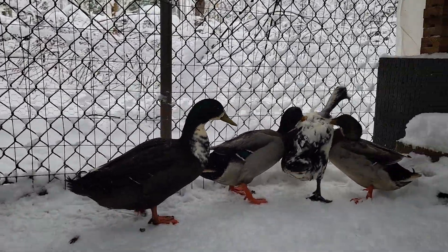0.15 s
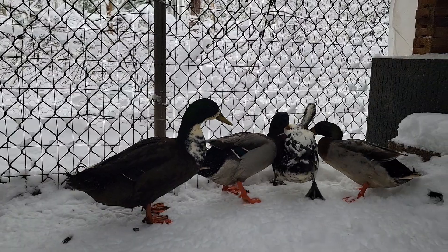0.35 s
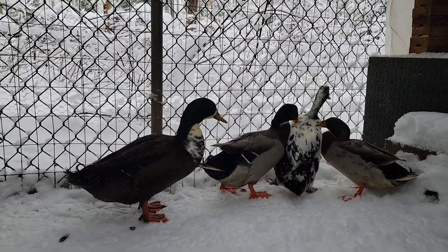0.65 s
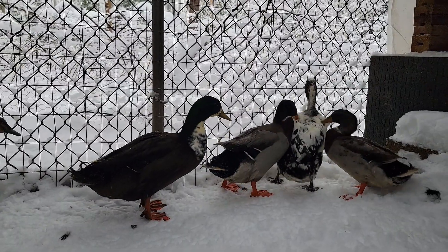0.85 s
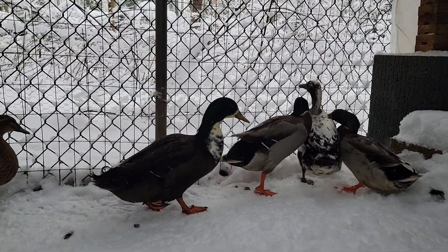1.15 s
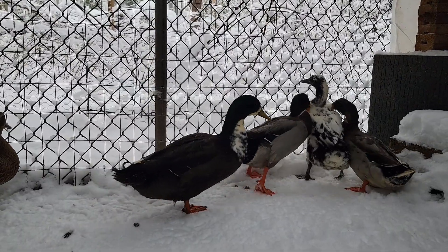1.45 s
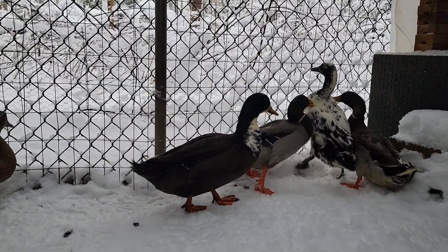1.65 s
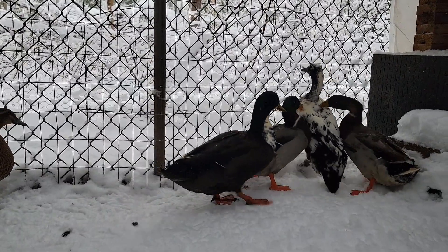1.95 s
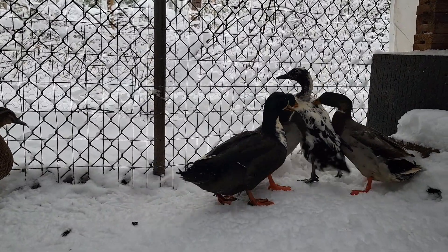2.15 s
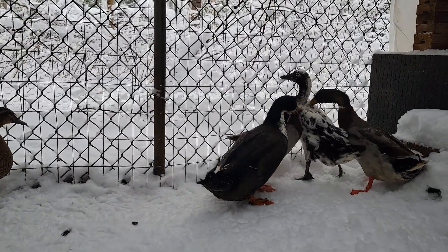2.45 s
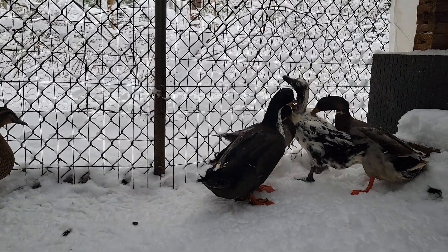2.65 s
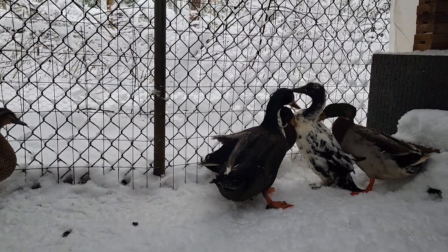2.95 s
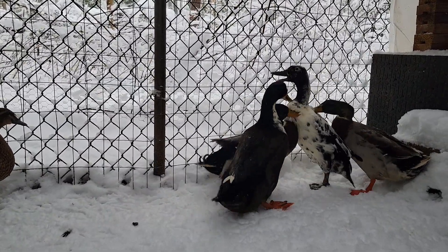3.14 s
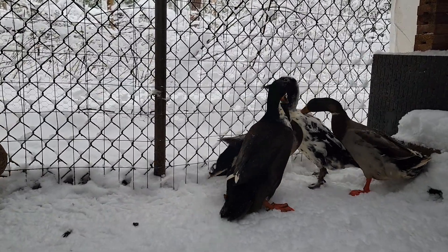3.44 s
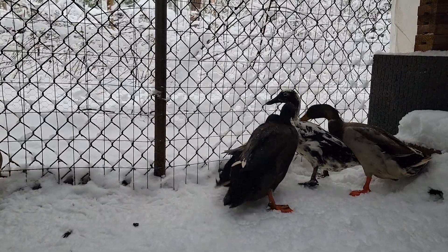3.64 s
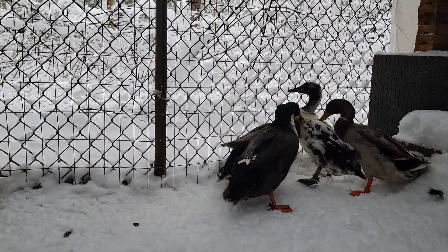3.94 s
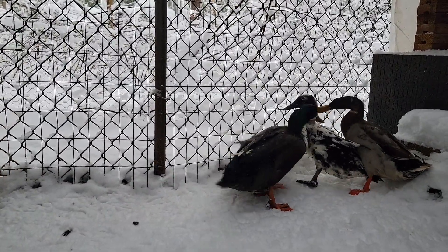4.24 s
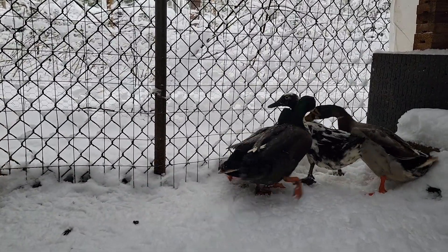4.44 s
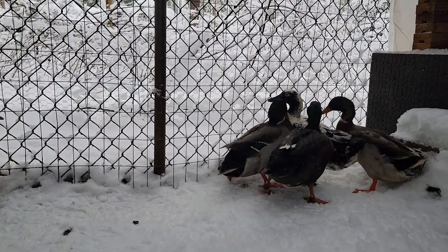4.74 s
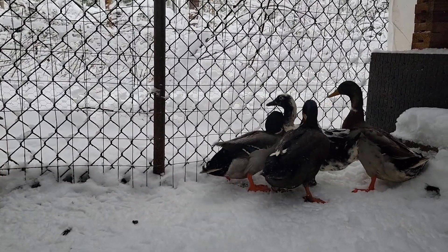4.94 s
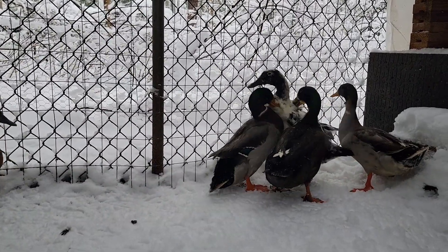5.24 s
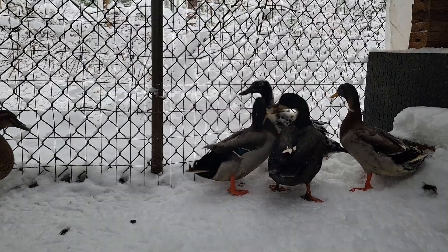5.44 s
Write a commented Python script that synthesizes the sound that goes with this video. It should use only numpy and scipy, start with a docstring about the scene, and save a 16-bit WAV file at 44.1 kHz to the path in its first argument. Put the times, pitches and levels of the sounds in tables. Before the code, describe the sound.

A quiet winter pen, heard in stereo from close by. A low, wavering engine drone, around 60 hertz, runs far off throughout, with dull outdoor murmur and faint hiss. At about 0.8 s a duck gives a loud, rasping quack, a quarter second long, starting low and rough and rising as the bill opens. A second, higher and brighter quack follows at 3.0 s, equally abrupt, with tight echoes from snow, wall and fence. Irregular dry ticks of bills and feathers continue underneath. Webbed feet softly thud and crunch on packed snow near 1.2, 1.4, 2.2, 3.5, 4.0-4.2 and 4.8 s, then in a quick cluster at 5.4-5.5 s. A dull low bump falls at 2.5 s. Thin, falling bird chirps sound far away at 0.5, 2.6 and 3.8 s. A barely audible whine enters after 3.2 s, and a soft two-pulse cluck comes at 5.3 s.

```python
"""A distant engine drones under quiet winter air: two wavering firing orders, filtered-noise rumble, murmur, hiss.
Bills and feathers tick (noise bursts); a small bird calls thinly far off (falling sines with scatter).
A duck gives two loud, rasping quacks: uneven pulses and puffs ring chest, throat, bill and windpipe.
Webbed feet pat and crunch on packed snow in a pen beside a house wall (enveloped noise).
Also one low noise bump, a faint far whine (sine) and, near the end, a soft two-pulse cluck (decaying sines)."""
import sys
import numpy as np
from scipy import signal
from scipy.fft import rfft, irfft, next_fast_len
from scipy.io import wavfile
from scipy.ndimage import uniform_filter1d

SR = 44100
rng = np.random.default_rng(int(sys.argv[2]) if len(sys.argv) > 2 else 0)


def generate_wav(signal):
    """Clip the signal to [-1, 1] and save it as 16-bit WAV at the path in sys.argv[1]."""
    frames = np.transpose(np.atleast_2d(signal))
    scaled = np.clip(frames, -1, 1) * 32767
    pcm = np.round(scaled).astype(np.int16)
    wavfile.write(sys.argv[1], SR, pcm)


N = 246519
TIME = np.arange(N) / SR

# distant engine speed: t/s, firing f/Hz
ENGINE_SPEED = [(0, 56.24), (.55, 56.61), (.75, 60.4), (1.35, 61.17), (1.6, 57.8), (2.15, 60.46),
                (2.55, 58.6), (2.9, 63.23), (4.1, 65.35), (4.95, 61.7), (5.59, 61.7)]
# noise colours: f/Hz, relative density/dB
RUMBLE_SPECTRUM = [(20, -12.5), (40, -10), (55, 4), (85, -3.5), (115, -4.5), (170, -14), (240, -35.5),
                   (400, -76)]
MURMUR_SPECTRUM = [(100, 1), (170, -2.5), (262, -11), (736, -14), (1010, -18), (1150, -16.5), (1490, -24),
                   (1990, -21.5), (3000, -43.5), (3900, -54), (6600, -120)]
HISS_SPECTRUM = [(1470, 4.5), (2500, 2), (2970, 0.5), (3660, -1.5), (4310, 0.5), (6760, -3.5), (7300, 3),
                 (8140, -11.5), (9730, -11.5), (13200, -10), (14400, -4.5), (15200, -1), (16000, -50)]
# hiss: t/s, mean level/dB
HISS_LEVEL = [(0, -65), (.4, -66), (.7, -68), (1.6, -67.5), (2.7, -67.5), (5.59, -66)]

# clearest ticks of bills and feathers: t/s, relative level/dB
CLEAR_TICKS = [(1.183, -61), (1.77, -61), (4.11, -58.5), (4.596, -55.5), (5.539, -55)]
# tick colour: f/Hz, relative density/dB
TICK_SPECTRUM = [(900, -39), (2000, -3.5), (5000, 4), (7500, 7.5), (9000, -3.5), (15500, -10)]
# thin falling bird calls: t/s, length/s, first f/Hz, last f/Hz, relative level/dB
CHIRPS = [(0.463, 0.05, 7690, 6970, -55.5), (2.565, 0.084, 7970, 7430, -64.5),
          (3.845, 0.054, 7610, 7070, -65)]

# quacks: start t/s, voice breaks t/s, push ends t/s, level/dB, wide-open throat f/Hz, wide-open bill f/Hz
QUACKS = [(.776, .85, 0.9757, 0, 740, 1236), (2.959, 3.003, 3.198, 0, 758, 1424)]
# syrinx of each quack: t/s, pulse rate/Hz, roughness/0-1
SYRINX_A = [(.776, 108, .4), (.80, 120, .5), (.83, 145, .7), (.86, 156, .6), (.885, 186, .3),
            (.935, 191, .12), (.96, 179, .15), (.99, 160, .3)]
SYRINX_B = [(2.959, 118, .4), (2.985, 155, .7), (3.005, 195, .7), (3.04, 220, .55), (3.07, 236, .35),
            (3.11, 238, .35), (3.14, 244.5, .2), (3.18, 245, .25), (3.21, 226, .5)]
# throat resonances: multiple of throat f, width/Hz, level/dB
THROAT_A = [(.56, 130, -36), (.87, 131, -7), (1.001, 152, 8), (1.26, 171, 4)]
THROAT_B = [(.68, 128, 1), (1, 120.2, 7.5), (1.22, 150, 6.5), (1.45, 150.1, -0.5)]
# open-bill resonances: multiple of bill f, width/Hz, level/dB
BILL_A = [(.9, 127, 15.5), (1.02, 162, 17.5), (1.18, 170, -43), (1.8, 350, -31)]
BILL_B = [(1, 200, 32), (1.16, 200, -16), (1.32, 200, -45), (1.66, 330, -21)]
# upper windpipe resonances: f/Hz, width/Hz, level/dB
WINDPIPE_A = [(3076, 150, 3.5), (4020, 450, -8), (4700, 390, -6), (5300, 430, -4.5), (6300, 450, -10.5),
              (7270, 600, -13.5), (10800, 2500, -26), (14800, 1500, -20)]
WINDPIPE_B = [(3140, 145, 2), (3930, 500, -7.5), (4400, 340, -4.5), (5070, 540, -8), (6300, 520, -13.5),
              (7100, 670, -12.5), (10900, 3100, -24), (14900, 1500, -17)]
# rows chest, throat, bill, rasp; before each quack's trim:
# level at full effort/dB, slope/(dB per octave of pitch), loss with bill shut/dB, attack/s, release/(dB/s)
VOICE_PARTS = [(-32.5, 6, -1.5, 0.0054, 650), (-28, 6.5, 3.5, 0.0035, 908), (-18, 12.5, 5, 0.0088, 1500),
               (-38.5, 17, 3.5, 0.0035, 900)]
# echoes off snow, wall and fence: delay/s, level re direct/dB, left lag of the echo itself/s (negative: left
# first)
ECHOES = [(.0016, -13, .0001), (.0054, -18, -.0003), (0.0103, -14, -.0001)]

# feet on snow: t/s, then relative levels/dB of thud, packing snow, crunch
STEPS = [(1.182, -45, -59.5, -59.5), (1.374, -49, -58, -70), (2.152, -42.5, -57.5, -70),
         (2.351, -46.5, -54.5, -52.5), (3.514, -34.5, -55.5, -54), (3.941, -42.5, -57.5, -57.5),
         (4.109, -40, -45, -52), (4.176, -48.5, -58.5, -88), (4.232, -46.5, -65, -67),
         (4.777, -40, -48.5, -62), (5.4, -40.5, -51, -49.5), (5.458, -35.5, -49.5, -46.5),
         (5.538, -36.5, -48, -45)]
# step colours: f/Hz, relative density/dB
THUD_SPECTRUM = [(100, -11), (150, 3.5), (220, -4), (280, -19.5), (400, -25)]
PACKING_SPECTRUM = [(220, -28), (320, -2), (430, 4), (560, 1.5), (730, 0), (950, -14), (1500, -16)]
CRUNCH_SPECTRUM = [(700, 3), (1100, 7), (1450, 4), (2100, 3), (3200, 3.5), (3600, -5), (5500, -6.5),
                   (7400, -8.5), (8800, -24), (16000, -14.5)]

# bump colour: f/Hz, relative density/dB
BUMP_SPECTRUM = [(30, -2), (60, 8), (140, -3), (220, -30)]
# faint far whine: t/s, f/Hz, mean level/dB
WHINE = [(3.2, 768, -82), (3.4, 760, -71.5), (4.6, 753.2, -68.5), (5.0, 744, -75.5), (5.5, 745, -78)]
# soft cluck pulses: t/s, level/dB
CLUCK_PULSES = [(5.312, -38.5), (5.321, -42.5)]
# throat rung by the cluck: f/Hz, level/dB, t60/s
CLUCK_MODES = [(443, -16, 0.033), (620, 0, 0.017), (885, 4, 0.0097), (1060, 3.5, 0.038)]

CRUISE_HZ, ENGINE_DB, ENGINE_DB_PER_HZ, SECOND_ORDER_DB = 63.04, -47, 0.9, -6.5
MURMUR_DB, MURMUR_SWAY_DB, HISS_FLICKER_DB = -58.5, 1.4, 1.7
FAINT_TICKS_PER_S, FAINT_TICK_DB, FAINT_TICK_SPREAD_DB = 7, -65, 3  # levels before TICK_GAIN_DB
TICK_GAIN_DB = 5.5
FULL_EFFORT_HZ, LIMP_POWER, TURBULENCE = 246.8, 2.3, 1.45
SHUT_THROAT_HZ, SHUT_BILL_HZ = 591, 970
OPENING_S, CLOSING_S, CLOSING_LEAD_S = 0.087, 0.087, 0.029
PORT_LAG_S = .00036
# change at each of two resettlings after a step
SETTLE_S, SETTLE_THUD_DB, SETTLE_PACKING_DB, SETTLE_CRUNCH_DB = 0.0363, -3.5, -5.5, -20
BUMP_S, BUMP_DB = 2.47, -33.5
CUTOFF_HZ = 15900


def from_db(db):
    """Decibels to gain."""
    return 10 ** (np.asarray(db) / 20)


def rms_one(x):
    """Scale to an rms of 1."""
    return x / np.sqrt(np.mean(x ** 2) + 1e-20)


def in_time(rows, t=TIME):
    """Columns of a curve, joined by straight lines."""
    s, *columns = np.transpose(rows)
    return [np.interp(t, s, c) for c in columns]


def butter(x, hz, kind, order=2):
    """Causal Butterworth filter."""
    return signal.sosfilt(signal.butter(order, hz, kind, fs=SR, output="sos"), x + 1e-18)


def drift(knots_per_s):
    """Random knots joined by lines; rms 1."""
    knots = rng.standard_normal(2048)
    return rms_one(np.interp(TIME * knots_per_s, np.arange(len(knots)), knots))


def delayed(x, seconds):
    """The sound a moment later."""
    return np.interp(TIME - seconds, TIME, x, left=0)


def at_ports(x, lag_s):
    """A sound from one side reaches the left port later than the right."""
    return np.array([delayed(x, lag_s / 2), delayed(x, -lag_s / 2)])


def noise(spectrum, alike):
    """Stereo noise of a given colour and left-right likeness; rms 1."""
    hz, db = np.transpose(spectrum)
    size = next_fast_len(N)
    f = np.maximum(np.arange(size // 2 + 1) * SR / size, 1)
    gain = from_db(np.interp(np.log(f), np.log(hz), db, left=-90, right=-90))
    mid, side = irfft(rfft(rng.standard_normal((2, size))) * gain, size)[:, :N]
    alike = np.clip(alike, 0, 1)
    return rms_one(np.sqrt(1 + alike) * mid + np.sqrt(1 - alike) * side * [[1], [-1]])


def burst(s, rise_s, length_s):
    """A quick swell that dies by 20 dB over its length."""
    age = np.maximum(TIME - s, 0)
    return np.minimum(age / rise_s, 1) * from_db(-20 * np.minimum(age / length_s, 10))


def yard(x, t60_s, band_hz, rise_s):
    """Diffuse scatter from fence, wall and trees, different on each side."""
    t = TIME[:SR]
    tail = butter(rng.standard_normal((2, SR)), band_hz, "band")
    tail = tail * from_db(-60 * np.minimum(t / t60_s, 4)) * np.minimum(t / rise_s, 1)
    return signal.fftconvolve(x[None], rms_one(tail) / np.sqrt(SR), axes=1)[:, :N]


def engine():
    """From far away only the two lowest firing orders arrive, louder with speed, over a rumble."""
    hz, = in_time(ENGINE_SPEED)
    db = ENGINE_DB + ENGINE_DB_PER_HZ * (hz - CRUISE_HZ)
    phase = 2 * np.pi * np.cumsum(hz) / SR + 0.046 * drift(9.1)
    first = from_db(db + 1.9 * drift(9)) * np.sin(phase)
    second_gain = from_db(db + SECOND_ORDER_DB + 4.44 * drift(12))
    second = second_gain * np.sin(2 * phase + 0.4 * drift(16))
    return np.sqrt(2) * (first + second) + from_db(-50.5) * noise(RUMBLE_SPECTRUM, 1.0)


def air():
    """A dull outdoor murmur and a faint, restless hiss: coloured noise of drifting level."""
    hiss_db, = in_time(HISS_LEVEL)
    murmur = from_db(MURMUR_DB + MURMUR_SWAY_DB * drift(9.1)) * noise(MURMUR_SPECTRUM, 0.5)
    hiss = from_db(hiss_db + HISS_FLICKER_DB * drift(54)) * noise(HISS_SPECTRUM, 0.01)
    return murmur + hiss


def bills():
    """Dry ticks of nibbling and preening: short noise bursts, the faint ones at random times."""
    draws = rng.random((60, 2))
    times = np.cumsum(-np.log(draws[:, 0])) / FAINT_TICKS_PER_S
    levels_db = FAINT_TICK_DB + FAINT_TICK_SPREAD_DB * (2 * draws[:, 1] - 1)
    faint = [(s, db) for s, db in zip(times, levels_db) if s < TIME[-1]]
    ticks = sum(from_db(db + TICK_GAIN_DB) * burst(s, 0.0013, 0.02) for s, db in list(CLEAR_TICKS) + faint)
    return ticks * noise(TICK_SPECTRUM, 0.1)


def small_bird():
    """A wavering whistle slides down and scatters among the trees."""
    song, waver_hz = 0, 90 * drift(400)
    for s, length_s, first_hz, last_hz, db in CHIRPS:
        part = np.clip((TIME - s) / length_s, 0, 1)
        hz = last_hz + (first_hz - last_hz) * (1 - part) ** 1.73 + waver_hz
        swell = np.sqrt(4 * part * (1 - part))
        song = song + from_db(db) * swell * np.sin(2 * np.pi * np.cumsum(hz) / SR)
    scatter = yard(song, t60_s=0.38, band_hz=[4000, 10000], rise_s=0.0086)
    return from_db(-8.0) * song + from_db(-1.5) * scatter


def resonate(x, hz, width_hz):
    """A resonance whose centre may move: a decaying phasor, turned sample by sample."""
    r = np.exp(-np.pi * width_hz / SR)
    turn = np.exp(2j * np.pi * np.cumsum(hz + np.zeros(len(x))) / SR)
    return 2 * np.real(turn * signal.lfilter([1 - r], [1, -r], x / turn))


def tract(x, modes, scale=1):
    """Resonances in parallel, with alternating signs."""
    return sum((-1) ** k * from_db(db) * resonate(x, hz * scale, width_hz)
               for k, (hz, width_hz, db) in enumerate(modes))


def even(x):
    """Hold the level near 1 over 900 samples, a few pulses."""
    return x / np.sqrt(np.abs(uniform_filter1d(x ** 2, size=900)) + 1e-12)


def quack(call, syrinx, throat, bill, windpipe, jitter, limp_share, trims_db):
    """Membranes slap in uneven pulses, each with a puff of air, and ring chest, throat, bill and windpipe."""
    start_s, break_s, end_s, level_db, open_throat_hz, open_bill_hz = call
    start, end = int(start_s * SR), int((end_s + .05) * SR)
    t = TIME[start:end]
    pitch_hz, rough = in_time(syrinx, t)
    # a harder push raises pitch, and with it loudness, brightness and limp
    effort_octaves = np.log2(pitch_hz / FULL_EFFORT_HZ)
    limp = (pitch_hz / FULL_EFFORT_HZ) ** LIMP_POWER

    # bill opens once the voice breaks, starts to close just before the push ends
    opening = np.sin(np.pi / 2 * np.clip((t - break_s) / OPENING_S, 0, 1))
    gape = opening * np.clip(1 - (t - end_s + CLOSING_LEAD_S) / CLOSING_S, 0, 1)
    throat_hz = SHUT_THROAT_HZ + gape * (open_throat_hz - SHUT_THROAT_HZ)
    bill_hz = SHUT_BILL_HZ + gape * (open_bill_hz - SHUT_BILL_HZ)

    # every second slap early and weak: lines between the harmonics
    cycle = np.cumsum(pitch_hz) / SR
    early = limp_share * limp * np.sin(np.pi * cycle / 2) ** 2
    slap = np.maximum.accumulate(cycle + jitter * rough * drift(260)[:len(t)] + early)
    hit = np.diff(np.floor(slap), prepend=-1) > 0
    strength = from_db(3 * rough * drift(200)[:len(t)] - 3 * limp * (np.floor(slap) % 2))
    puff = rms_one(rng.standard_normal(len(t)) * np.exp(-3 * (slap % 1)) * strength)
    source = rms_one(hit * strength) + TURBULENCE * rough * puff

    chest_ring = butter(resonate(source, 127, 76), [130, 290], "band")
    chest = np.sin(2 * np.pi * cycle) + 0.6 * even(chest_ring)
    low = butter(tract(source, throat, throat_hz), [390, 1150], "band", order=3)
    mid = butter(tract(source, bill, bill_hz), [950, 2220], "band", order=5)
    top = butter(tract(source + puff, windpipe), 2700, "high", order=6)
    top = butter(top, 8000, "low")

    released_s = np.maximum(t - end_s, 0)
    voice = 0
    for part, trim_db, row in zip((chest, low, mid, top), trims_db, VOICE_PARTS):
        db, db_per_octave, shut_db, attack_s, release_db_per_s = row
        force_db = level_db + trim_db + db + db_per_octave * effort_octaves
        force_db = force_db - shut_db * (1 - gape) - release_db_per_s * released_s
        voice = voice + from_db(force_db) * np.minimum((t - t[0]) / attack_s, 1) * even(part)
    return np.pad(voice, (start, N - end))


def quacks():
    """Two calls, right port first but left louder, with near echoes, wire-mesh smear and a faint tail."""
    first = quack(QUACKS[0], SYRINX_A, THROAT_A, BILL_A, WINDPIPE_A, jitter=0.12, limp_share=0.079,
                  trims_db=[1.1, 1.2, -0.69, -3.0])
    second = quack(QUACKS[1], SYRINX_B, THROAT_B, BILL_B, WINDPIPE_B, jitter=.07, limp_share=.09,
                   trims_db=[-0.38, -.3, -0.073, .3])
    voice = first + second
    echoes = sum(from_db(db) * at_ports(delayed(voice, s), lag_s) for s, db, lag_s in ECHOES)
    near = at_ports(voice, PORT_LAG_S) + echoes
    mesh = from_db(-3.0) * yard(voice, t60_s=.045, band_hz=[3000, 15000], rise_s=.001)
    tail = from_db(-43.5) * yard(voice, t60_s=0.72, band_hz=[300, 2500], rise_s=0.0079)
    return (near + mesh) * from_db([[1.5], [-2.0]]) + tail


def press(s, rise_s, length_s, settle_db):
    """The weight lands and settles twice more, each time softer; powers add."""
    powers = [(from_db(k * settle_db) * burst(s + k * SETTLE_S, rise_s, length_s)) ** 2 for k in range(3)]
    return np.sqrt(sum(powers))


def feet():
    """A webbed foot thuds and settles, snow packs in lumps under it, the crust crumbles in grains."""
    thud = sum(from_db(db) * press(s - .003, 0.0072, 0.08, SETTLE_THUD_DB) for s, db, _, _ in STEPS)
    packing = sum(from_db(db) * press(s - .002, 0.0023, 0.11, SETTLE_PACKING_DB) for s, _, db, _ in STEPS)
    crunch = sum(from_db(db) * press(s - .004, 0.0088, 0.097, SETTLE_CRUNCH_DB) for s, _, _, db in STEPS)
    lumps = rms_one(from_db(4 * drift(160)))
    grains = rms_one(from_db(3 * drift(350)))
    low = from_db(-1.0) * thud * noise(THUD_SPECTRUM, 1.0)[0]
    low = low + from_db(1.5) * packing * lumps * noise(PACKING_SPECTRUM, 0.99)[0]
    return at_ports(low, PORT_LAG_S) + from_db(0.5) * crunch * grains * noise(CRUNCH_SPECTRUM, 0.037)


def bump():
    """One dull, low bump: a burst of low noise."""
    return from_db(BUMP_DB) * burst(BUMP_S, 0.012, 0.13) * noise(BUMP_SPECTRUM, 0.99)


def whine():
    """A thin tone from far away, unsteady in pitch and level."""
    hz, db = in_time(WHINE)
    tone = np.sin(2 * np.pi * np.cumsum(hz + 14 * drift(70)) / SR)
    return from_db(db + 3.4 * drift(18)) * np.sqrt(2) * tone


def cluck():
    """The syrinx slaps just twice behind a closed bill; throat modes ring and die."""
    out = 0
    for s, db in CLUCK_PULSES:
        age = np.maximum(TIME - s, 0)
        for hz, mode_db, t60_s in CLUCK_MODES:
            decay = from_db(db + mode_db - 60 * np.minimum(age / t60_s, 5))
            out = out + decay * np.sin(2 * np.pi * hz * age)
    return at_ports(butter(out, 1540, "low", order=5), PORT_LAG_S)


def scene():
    """Everything in the pen, left and right."""
    background = (engine() + bump() + whine() + air()) * from_db([[.4], [-.4]])
    return quacks() + cluck() + feet() + bills() + small_bird() + background


def record(dry):
    """Steep elliptic low-pass."""
    return signal.sosfilt(signal.ellip(10, .1, 70, CUTOFF_HZ, fs=SR, output="sos"), dry)


dry = scene()
out = record(dry)
generate_wav(out)
```